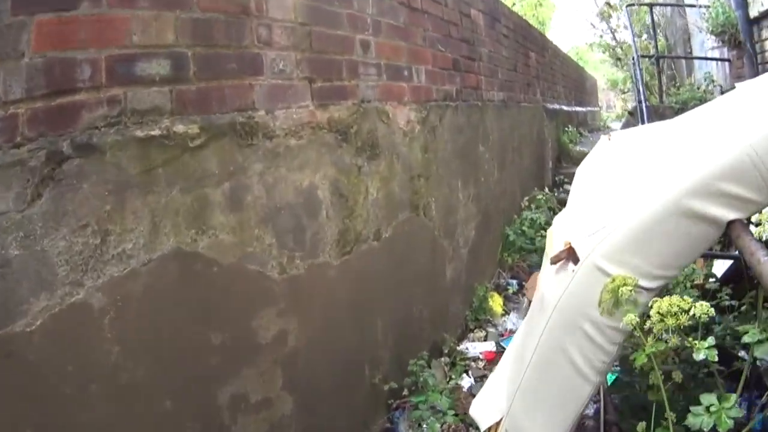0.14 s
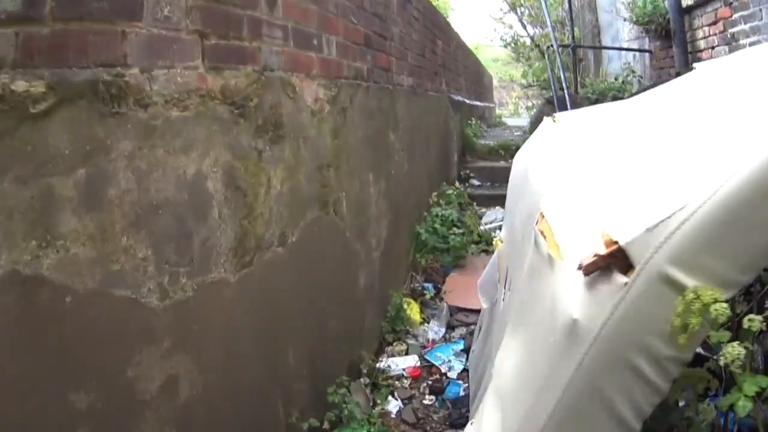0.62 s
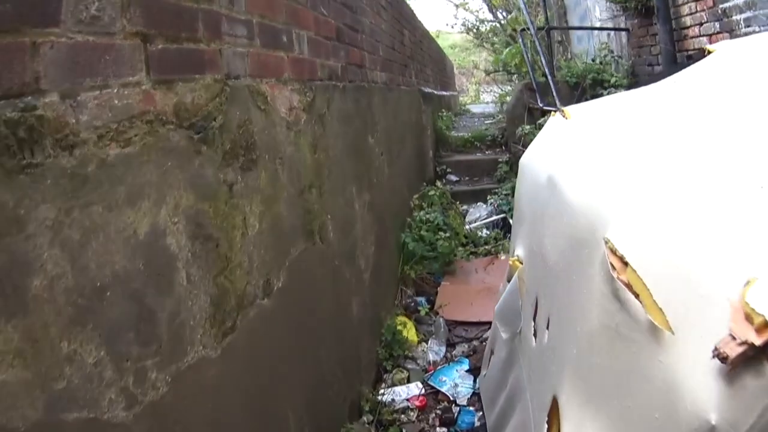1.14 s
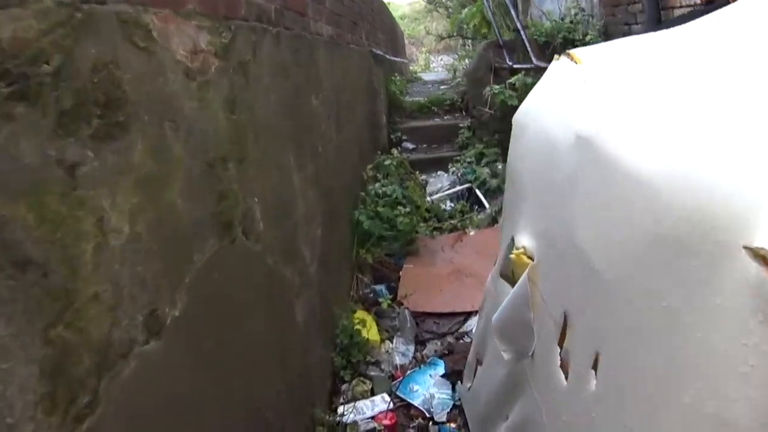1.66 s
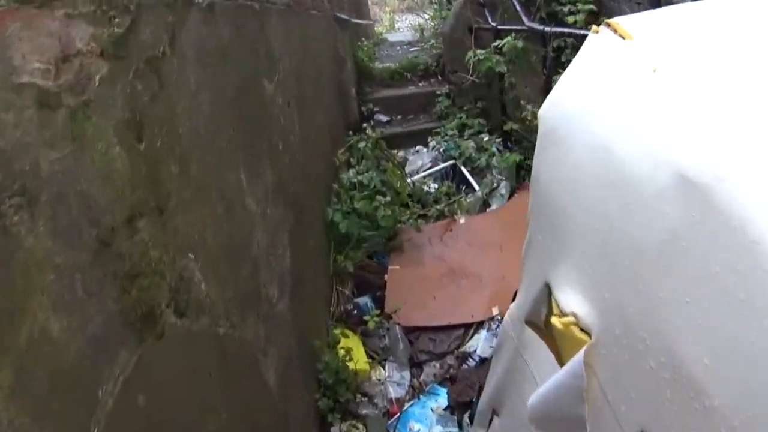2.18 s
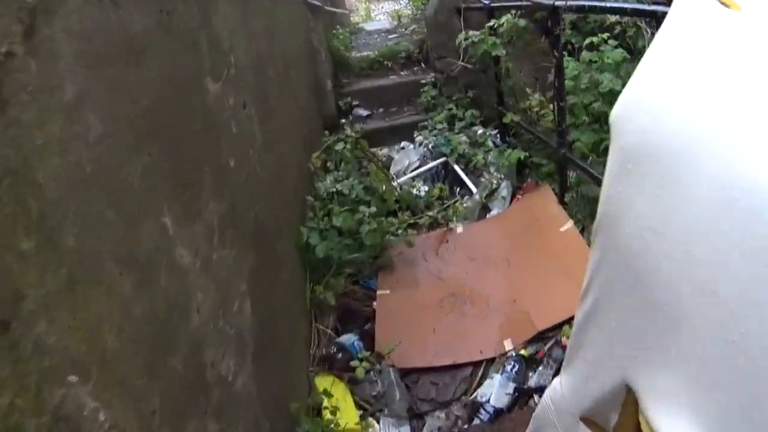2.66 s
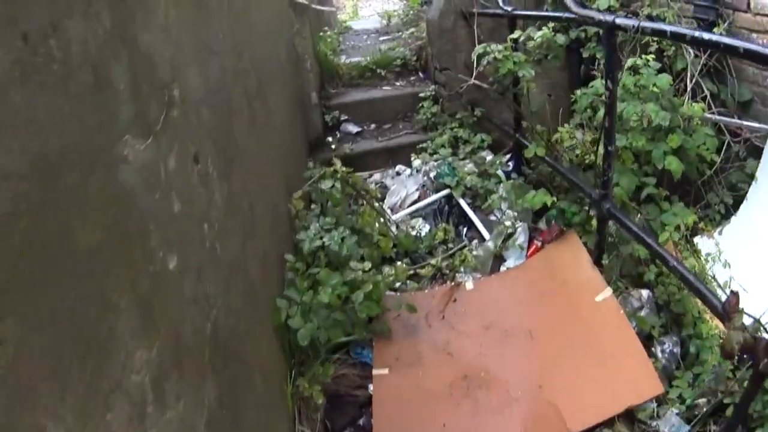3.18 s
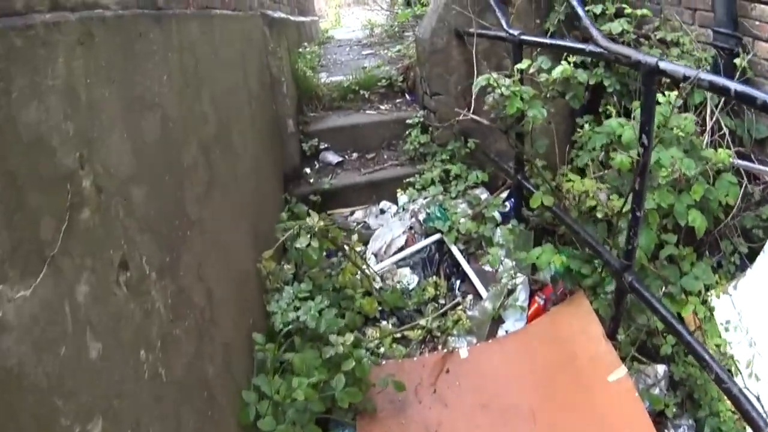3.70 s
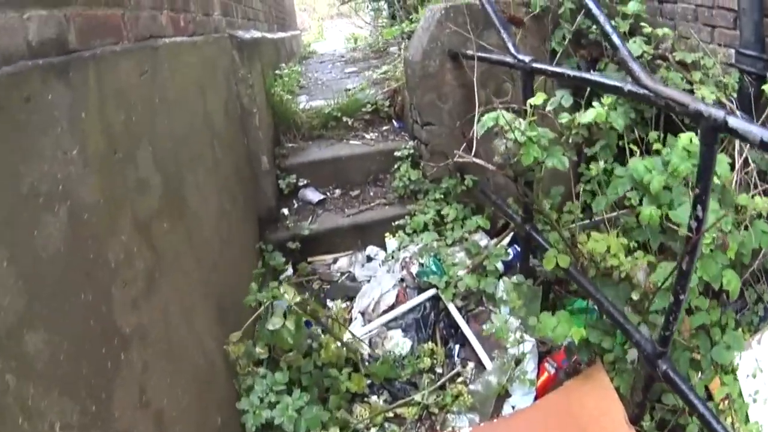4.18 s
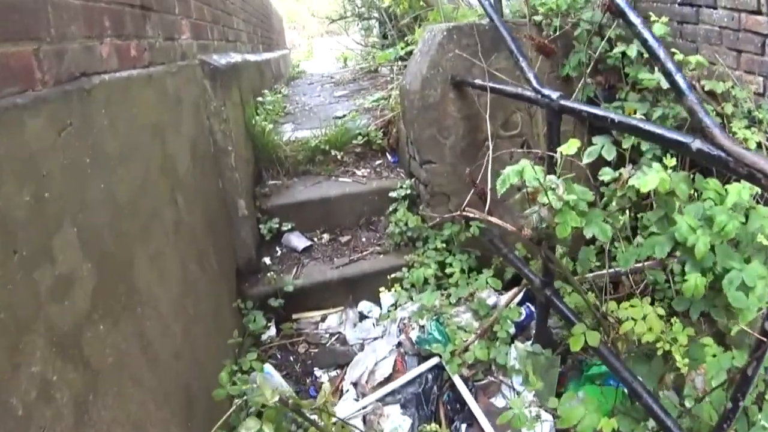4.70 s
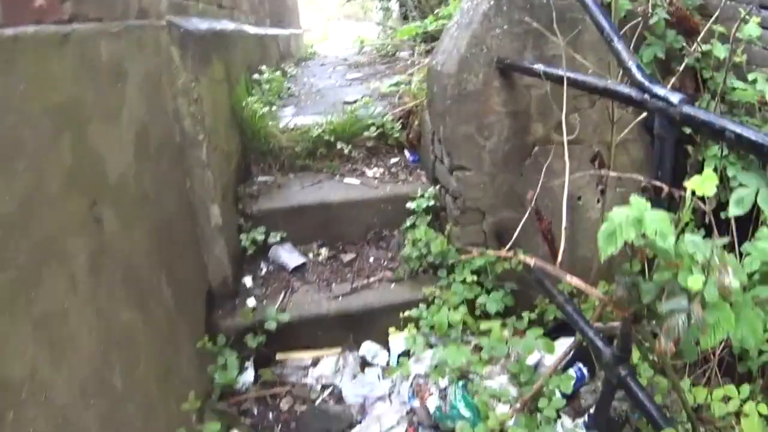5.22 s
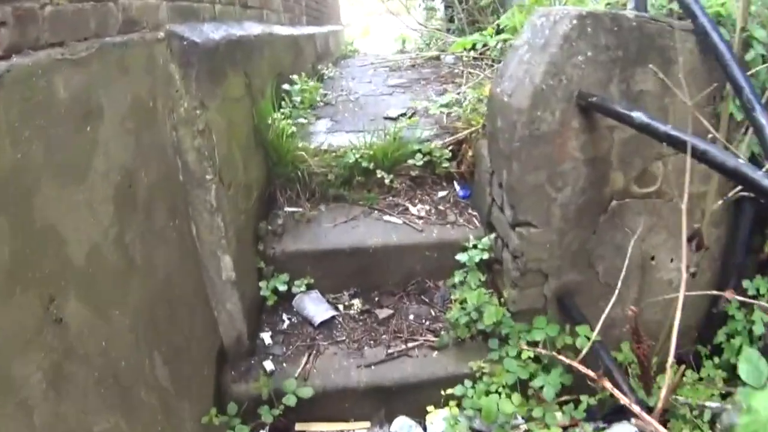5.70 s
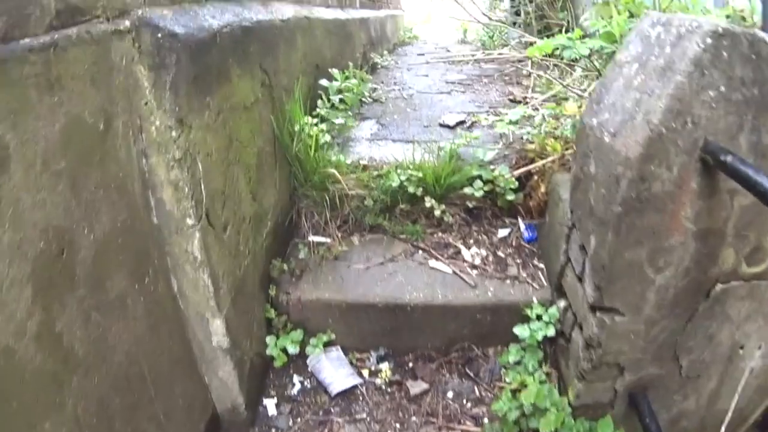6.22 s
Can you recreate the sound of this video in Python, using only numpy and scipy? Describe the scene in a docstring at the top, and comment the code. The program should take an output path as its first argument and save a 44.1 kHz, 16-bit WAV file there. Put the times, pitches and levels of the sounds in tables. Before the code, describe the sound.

Outdoors in a tight walled passage, a person walks carefully over brittle rubbish, stems and a board. Sparse crackles and brushing leaves give way to isolated hard snaps, dull sole thuds and hollow taps. Thin birds whistle far away over a low town murmur. After a low handling bump, the last step crushes litter in a thick burst of crackling. Close stereo handheld microphone, brief wall reflections.

```python
"""Someone walks slowly over litter, dry stems and a board in a narrow walled passage outdoors.
From the start far town noise (shaped noise bands) lies below leaves and cloth rustling (clumped grains),
small cracks (grain sprays ringing a mode), hollow knocks and soft soles (damped modes). Louder cracks come
near 1.5, 4 and 5 s; far birds (wavering sines) whistle past 3 and 5 s; a jolt (slow wobble) at 5.4 s leads
into the densest crunch, from 5.8 s on. The walls answer cracks and knocks with a short wash of echoes."""
import sys
import numpy as np
from scipy import signal
from scipy.io import wavfile

SR = 44100
rng = np.random.default_rng(int(sys.argv[2]) if len(sys.argv) > 2 else 0)


def wav_out(sig):
    """Save sig, one row per channel (or a flat mono array), as 16-bit PCM at SR to the path in sys.argv[1]."""
    wavfile.write(sys.argv[1], SR, np.round(np.clip(np.atleast_2d(sig).T, -1, 1) * 32767).astype(np.int16))


def boost_factor(decibels):
    """Convert a level in decibels to a linear amplitude factor."""
    exponent = np.asarray(decibels, float) / 20
    return 10 ** exponent


N = 280035
STIR_DB = -65   # faint rustle between strides, rms


def rms_one(x):
    """Normalise the mean power to one."""
    return x / np.sqrt(np.mean(x ** 2) + 1e-20)


def peak_one(x):
    """Normalise the peak of each row to one."""
    return x / (np.abs(x).max(axis=-1, keepdims=True) + 1e-20)


def at_hz(points, hz):
    """Interpolate a spectrum linearly over log frequency."""
    table_hz, value = np.array(points).T
    return np.interp(np.log(hz), np.log(table_hz), value)


def band(x, low_hz, high_hz):
    """Causal Butterworth band-pass along time."""
    return signal.sosfilt(signal.butter(2, [low_hz, high_hz], "band", fs=SR, output="sos"), x)


def drift(rate_hz):
    """Low-passed noise: a slow random wander of unit spread."""
    step = 40   # samples between the points of the slow curve
    r = np.exp(-2 * np.pi * rate_hz * step / SR)
    noise = rng.standard_normal(N // step + 2002)
    slow = signal.lfilter([1], [1, -2 * r, r * r], noise)[2000:]   # without the filter's start
    return np.interp(np.arange(N) / step, np.arange(len(slow)), rms_one(slow))


def ring(x, hz, t60):
    """Resonance: a two-pole filter is one damped mode, falling 60 dB in t60 seconds."""
    r = boost_factor(-60 / (t60 * SR))
    w = 2 * np.pi * hz / SR
    return signal.lfilter([0, np.sin(w)], [1, -2 * r * np.cos(w), r * r], x)


def place(seconds, sounds):
    """Superposition: short sounds add on the time line."""
    out = np.zeros(N + sounds.shape[1])
    for s, sound in zip(seconds, sounds):
        start = round(s * SR)
        out[start:start + len(sound)] += sound
    return out[:N]


def grains(shape, spread_db):
    """Fracture noise: dense tiny breaks whose uneven sizes follow an exponential law in dB."""
    size_db = spread_db * np.minimum(rng.exponential(size=shape), 5)
    return rng.standard_normal(shape) * boost_factor(size_db)


def cracks(rows, ring_cycles=6.7, rise_s=0.00034, first_db=-11.0, first_s=0.0013, wide=0.36):
    """Brittle fracture: a hard start runs out as a spray of grains that rings the piece and snaps above it."""
    # level difference between the sides: (frequency [Hz], left over right [dB])
    side_lean = [(270, 4), (570, 1), (2500, -0.6)]
    s, peak_db, hz, snap_db, t60 = np.transpose(rows)
    treble_db = -12 + 1.41 * snap_db   # a snappier break is also brighter on top
    t = np.arange(SR // 8) / SR
    dying = boost_factor(-60 * t / np.clip(t60, .004, .3)[:, None])
    first_burst = 1 + boost_factor(first_db) * np.exp(-t / first_s)
    shape = dying * first_burst * (1 - np.exp(-t / rise_s))
    centre, spread = np.moveaxis(grains((len(s), 2, len(t)), spread_db=4.0), 1, 0) * shape
    out = []
    for way in 1, -1:      # each microphone hears the fracture from a slightly different face
        spray = centre + way * wide * spread
        rung = [ring(x, f, ring_cycles / f) for x, f in zip(spray, hz)]
        piece = peak_one(band(rung, 290, 8700))
        snap = boost_factor(snap_db[:, None]) * peak_one(band(band(spray, 1070, 4920), 1340, 8570))
        treble = boost_factor(treble_db[:, None]) * peak_one(band(spray, 4600, 8000))
        level = boost_factor(peak_db + way * at_hz(side_lean, hz) / 2)
        out.append(place(s, level[:, None] * (piece + snap + treble)))
    return np.array(out)


def bits(mid_db, count=40):
    """Random point process: lesser breaks come likelier and louder the harder the litter is brushed."""
    over_rustle_db, spread_db = 6.5, 4.5
    low_hz, high_hz, snap_db, t60 = 1200, 3800, -7, 0.016
    when, size, pitch = rng.random((count, 3)).T
    chance = np.cumsum(np.maximum(mid_db - STIR_DB - 3, 0))
    share = (np.arange(count) + when) / count   # one draw in each equal share of the chance
    at = np.searchsorted(chance, share * chance[-1]).clip(0, N - 1)
    peak_db = mid_db[at] + over_rustle_db - spread_db * np.log(size + .05)
    hz = low_hz * (high_hz / low_hz) ** pitch
    same = np.ones(count)
    return np.transpose([at / SR, peak_db, hz, snap_db * same, t60 * same])


def hollow_litter(crunch):
    """Sympathetic resonance: a hollow piece of litter rings along with the cracks."""
    return boost_factor(-56.5) * rms_one(band(ring(crunch, hz=897, t60=0.093), 750, 930))


def knocks(tick_db=-9.0, contact_s=0.00034):
    """Impact: a soft contact excites one hollow mode, with a faint noisy tick."""
    # hollow bits knocked or dropped: (time [s], peak level of the mode [dB], frequency [Hz], t60 [s])
    hollow_bits = [(0.253, -43, 406, 0.01), (0.331, -38, 562, 0.029), (0.607, -39.5, 670, 0.0081),
                   (1.453, -47.5, 440, 0.02), (1.582, -36, 860, 0.015), (1.636, -29.5, 807, 0.025),
                   (2.545, -40, 733, 0.034), (5.393, -44, 430, 0.02), (5.707, -31.5, 762, 0.05),
                   (5.713, -27, 750, 0.019)]
    s, peak_db, hz, t60 = np.transpose(hollow_bits)
    t = np.arange(SR // 8) / SR
    dying = boost_factor(-60 * t / np.clip(t60, .01, .2)[:, None]) * (1 - np.exp(-t / contact_s))
    hollow = peak_one(band(np.sin(2 * np.pi * hz[:, None] * t) * dying, 470, 1400))
    tick = peak_one(band(rng.standard_normal(dying.shape) * dying ** 2, 600, 3300))
    return place(s, boost_factor(peak_db[:, None]) * (hollow + boost_factor(tick_db) * tick))


def thuds(contact_s=0.00087, puff_db=3.0):
    """Impact: a soft push excites a low mode of ground or board, with a dull puff of noise."""
    # soles landing: (time [s], peak level of the push [dB], frequency [Hz], t60 before limits [s])
    soles = [(0.328, -52, 252, 0.21), (1.522, -43, 261, 0.28), (2.544, -52, 420, 0.094),
             (2.654, -50.5, 143, 0.17), (2.697, -48, 78.5, 0.27), (2.835, -45.5, 144, 0.11),
             (3.8, -38.5, 97, 0.18), (4.001, -38, 269, 0.052), (4.141, -45.5, 252, 0.11),
             (4.797, -40.5, 207, 0.13), (4.859, -39, 326, 0.26), (4.897, -29.5, 306, 0.037),
             (5.037, -38, 209, 0.079), (5.351, -48.5, 118, 0.55), (5.389, -37, 73, 0.19),
             (5.586, -43.5, 188, 0.15), (5.776, -30, 319, 0.096), (6.064, -39.5, 343, 0.25)]
    s, peak_db, hz, t60 = np.transpose(soles)
    t = np.arange(SR // 3) / SR
    dying = boost_factor(-60 * t / np.clip(t60, .02, .5)[:, None]) * (1 - np.exp(-t / contact_s))
    puff = peak_one(band(rng.standard_normal(dying.shape) * dying, 81, 447))
    push = peak_one(np.sin(2 * np.pi * hz[:, None] * t) * dying)
    return place(s, boost_factor(peak_db[:, None]) * (push + boost_factor(puff_db) * puff))


def brushing():
    """Power addition: brushes that swell, hold and fade sum to the levels of the rub and its treble in dB."""
    # legs and soles brushing leaves, litter and cloth: (time fully swelled [s], hold [s], level [dB],
    # treble over level [dB], swell [dB/s])
    brushes = [(0.548, .02, -55, -32, 99.5), (0.713, .11, -54, -13.5, 59.5),
               (1.019, .17, -55.5, -12.5, 298), (1.491, .32, -55.5, -16, 101.5),
               (2.401, .12, -56, -10, 151.5), (2.709, .03, -52.5, -16, 61), (2.877, .03, -57.5, -10, 60),
               (3.227, .03, -52.5, -29, 110), (3.428, 0.022, -49.5, -20, 149), (4.043, .02, -47, -10, 101),
               (4.294, .03, -59, -32, 39.5), (4.848, .13, -53.5, -17, 130), (5.031, .11, -53, -28, 99),
               (5.349, .02, -53.5, -11, 251), (5.566, .01, -49, -20, 170), (5.798, .05, -29, -9, 1196.5),
               (5.96, .11, -41, -32, 201), (6.241, .12, -59.5, -14, 58.5)]
    s, hold, level_db, treble_db, swell = np.transpose(brushes)[:, :, None]
    fade_db_per_s, stir_treble_db = 150.5, -88
    t = np.arange(N) / SR - s
    db = level_db - swell * np.maximum(-t, 0) - fade_db_per_s * np.maximum(t - hold, 0)
    mid = boost_factor(2 * STIR_DB) + boost_factor(2 * db).sum(axis=0)   # twice the dB gives power
    treble = boost_factor(2 * stir_treble_db) + boost_factor(2 * (db + treble_db)).sum(axis=0)
    return 10 * np.log10(mid), 10 * np.log10(treble)


def rustle(mid_db, treble_db, clump_db=2.0, wide=0.61):
    """Friction noise: leaves and litter rub in clumps of fine grains, spread around the walker."""
    clumping = clump_db + .08 * np.maximum(mid_db + 55, 0)   # heavier crushing breaks into separate crackles
    clumps = boost_factor(clumping * (drift(25) + drift(90)))
    centre, spread = grains((2, N), spread_db=4.0) * clumps
    rub = centre + wide * spread * [[1], [-1]]
    mid = boost_factor(mid_db) * rms_one(band(rub, 1110, 4600))
    return mid + boost_factor(treble_db) * rms_one(band(rub, 3900, 7000))


def passage(x):
    """Reverberation: close rough walls and leaves scatter the sound into a dying wash, other on each side."""
    level_db, split_hz, low_t60, high_t60 = -11, 3680, 0.15, 0.15
    t = np.arange(SR // 3) / SR
    echoes = rng.standard_normal((2, len(t))) * (1 - np.exp(-t / 0.00033))
    low = band(echoes, 200, split_hz) * boost_factor(-60 * t / low_t60)
    high = band(echoes, split_hz, 8000) * boost_factor(-60 * t / high_t60)
    wash = low + high + 2.0 * low[::-1]      # below the split the wash is much alike on both sides
    wash = wash / np.sqrt((wash ** 2).sum(axis=1, keepdims=True))   # unit energy
    return boost_factor(level_db) * signal.fftconvolve(x[None], wash, axes=1)[:, :N]


def jolt():
    """Gaussian-windowed oscillation: a slow wobble of the housing swells and dies."""
    # the hand jolts the microphones: (time [s], peak level [dB], frequency [Hz], standard deviation [s])
    hand_jolt = (5.383, -29, 26, .03)
    s, peak_db, hz, half_s = hand_jolt
    t = np.arange(N) / SR - s
    return boost_factor(peak_db) * np.exp(-(t / half_s) ** 2 / 2) * np.cos(2 * np.pi * hz * t)


def birds(waver=0.022):
    """Frequency and amplitude modulation: thin whistles waver slightly in pitch and strength."""
    # far birds: (start [s], end [s], mean frequency [Hz], rms level before swell and wander [dB])
    notes = [(3.138, 3.335, 2670, -67), (3.47, 3.558, 3320, -63), (3.55, 3.624, 3460, -70.5),
             (3.59, 3.662, 2920, -73), (3.694, 3.78, 2220, -67), (5.175, 5.276, 2340, -67),
             (5.3, 5.467, 2340, -63)]
    t, out = np.arange(N) / SR, 0
    for start, end, hz, level_db in notes:
        swell = np.sin(np.pi * np.clip((t - start) / (end - start), 0, 1)) ** .5
        tone = np.sin(2 * np.pi * hz * np.cumsum(1 + waver * drift(8.15)) / SR)
        out = out + np.sqrt(2) * boost_factor(level_db + 3.5 * drift(15)) * swell * tone
    return out


def town(level_db=-56, patchy_db=.7):
    """Partial coherence: far traffic and air as half-octave noise bands, each wandering a little."""
    # spectrum shape: (frequency [Hz], relative density [dB per Hz])
    spectrum = [(12, -32), (20, 3.5), (81, -2), (227, -6.5), (295, -5), (488, -8), (785, -6), (1050, -9),
                (1440, -10), (1980, -17.5), (2510, -21), (11000, -38.5), (14300, -65), (22000, -120)]
    # correlation of the two sides: (frequency [Hz], left-right likeness [-1 to 1])
    likeness = [(60, 0.99), (170, 0.93), (490, 0.58), (1400, 0.22), (4000, 1), (11000, 0.68)]
    out, together = 0, drift(1.5)
    edges = 18 * 2 ** np.arange(0, 9.6, .5)
    white = rng.standard_normal((2, 2, N))
    for k, (low, high) in enumerate(zip(edges, edges[1:])):
        mid, side = band(white[k % 2], low, high)   # neighbouring bands use different noise
        hz = np.sqrt(low * high)
        alike = np.clip(at_hz(likeness, hz), -1, 1)
        gain = boost_factor(at_hz(spectrum, hz) + patchy_db * (0.2 * together + drift(4.5)))
        out = out + gain * (np.sqrt(1 + alike) * mid + np.sqrt(1 - alike) * side * [[1], [-1]])
    return boost_factor(level_db) * rms_one(out)


def scene():
    """Superposition: feet just below the microphones, walls on both sides, birds and town far off."""
    # the clearest things breaking underfoot: (time [s], peak level of the ringing piece [dB],
    # ring frequency [Hz], snap over piece [dB], t60 of the spray [s])
    clear_cracks = [(0.143, -47.5, 1180, 5, 0.054), (0.199, -43.5, 2830, 8.5, 0.047),
                    (0.329, -36.5, 1600, -13, 0.028), (0.535, -42, 2810, 2, 0.069),
                    (0.684, -34.5, 1900, -2, 0.03), (0.732, -34, 2100, -1, 0.03),
                    (0.764, -33, 2070, 0.5, 0.075), (0.808, -39, 1650, 0, 0.052),
                    (0.998, -37.5, 4160, -28, 0.052), (1.401, -40, 1880, -13, 0.013),
                    (1.522, -12.5, 1980, 6.5, 0.011), (1.530, -16.5, 3130, -4, 0.071),
                    (1.542, -13, 4660, -37, 0.039), (1.557, -22.5, 3820, -14, 0.089),
                    (1.84, -28, 2170, 1, 0.021), (2.826, -48, 2720, 10.5, 0.021),
                    (2.841, -44, 4220, 14, 0.024), (3.175, -46.5, 2560, 12.5, 0.018),
                    (3.227, -49.5, 2730, 15.5, 0.034), (3.287, -38.5, 1830, -0.5, 0.028),
                    (3.772, -31, 2520, -16, 0.052), (3.791, -28.5, 2560, 1, 0.018),
                    (3.798, -25.5, 1940, 0.5, 0.094), (3.941, -35.5, 4820, -3, 0.017),
                    (3.964, -19.5, 1670, -5.5, 0.016), (3.973, -25, 1120, 0, 0.032),
                    (3.991, -40, 1450, 13, 0.017), (4.006, -13.5, 4870, 5, 0.015),
                    (4.016, -25, 4030, 3, 0.05), (4.057, -39, 2140, -14, 0.024),
                    (4.069, -22, 1830, -19, 0.0077), (4.129, -26, 3620, 3, 0.0071),
                    (4.732, -52, 3480, 12, 0.028), (4.767, -43.5, 1340, 6.5, 0.063),
                    (4.82, -38, 680, -6, 0.057), (4.881, -29.5, 690, 1, 0.11),
                    (4.907, -18.5, 780, -0.5, 0.056), (4.913, -12, 5900, 2, 0.042),
                    (5.035, -18.5, 670, -20, 0.01), (5.057, -24.5, 880, 4.5, 0.03),
                    (5.073, -9.5, 1850, -2.5, 0.011), (5.113, -28.5, 1370, 1, 0.072),
                    (5.78, -14.5, 840, 6, 0.072), (5.785, -19, 920, -12, 0.025),
                    (5.794, -14.5, 1170, 7, 0.022), (5.807, -12, 1440, 4, 0.033),
                    (5.813, -19, 850, 14.5, 0.019), (5.827, -7.5, 2190, 4.5, 0.02),
                    (5.834, -13, 1140, -4, 0.043), (5.861, -14, 4300, 0.5, 0.02),
                    (5.875, -18.5, 1140, 8, 0.05), (5.932, -24, 990, 9, 0.048),
                    (5.956, -10.5, 2000, -2, 0.067), (5.991, -15.5, 1150, 3, 0.045),
                    (6.01, -20.5, 3600, 0, 0.026), (6.029, -15.5, 1910, -10, 0.035),
                    (6.054, -15.5, 1080, 2, 0.017), (6.072, -14, 1570, -2, 0.013),
                    (6.157, -17, 4500, -2.5, 0.02)]
    mid_db, treble_db = brushing()
    crunch = cracks(np.vstack([clear_cracks, bits(mid_db)]))
    # gains in pairs are (left, right) in dB
    crunch = crunch + hollow_litter(crunch) + knocks() * boost_factor([[.7], [-.7]])
    soles = thuds() * boost_factor([[.9], [-.9]])
    near = crunch + soles + passage(crunch.mean(axis=0)) + jolt()
    far = town() + birds() * boost_factor([[1.5], [-1.5]])
    return near + rustle(mid_db, treble_db) + far


def roll_off(x):
    """The treble ends steeply here."""
    return signal.sosfilt(signal.butter(12, 11940, fs=SR, output="sos"), x)


def record(dry):
    """Low-pass filtering: a steep Chebyshev slope takes the top down by 26 dB from 11300 Hz on."""
    finished = signal.sosfilt(signal.cheby2(12, 26, 11300, fs=SR, output="sos"), dry)
    return roll_off(finished)


dry = scene()
out = record(dry)
wav_out(out)
```